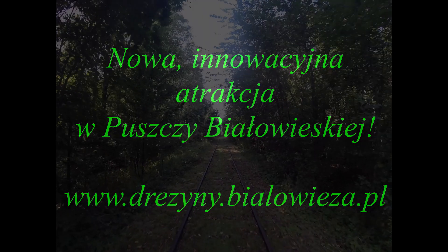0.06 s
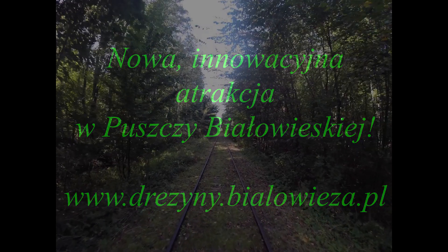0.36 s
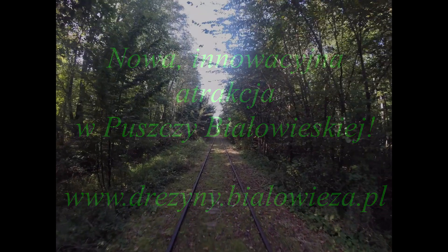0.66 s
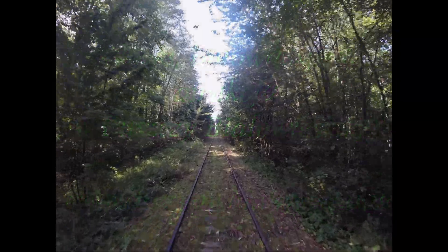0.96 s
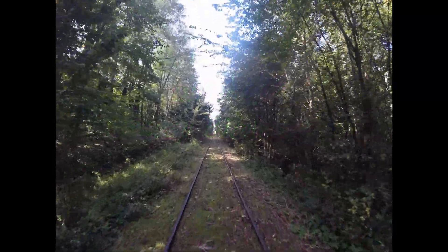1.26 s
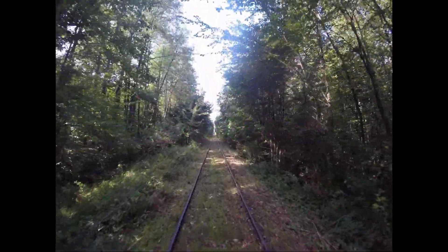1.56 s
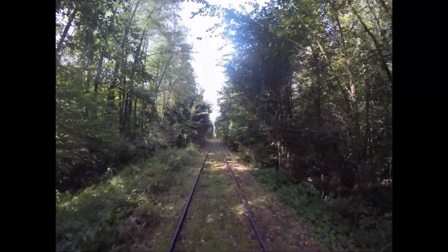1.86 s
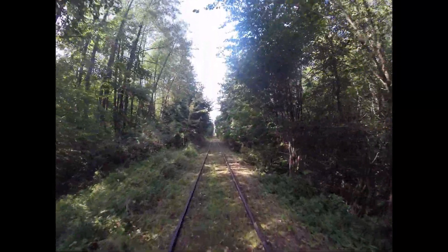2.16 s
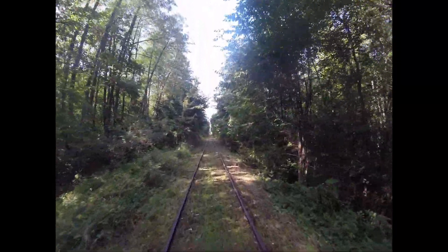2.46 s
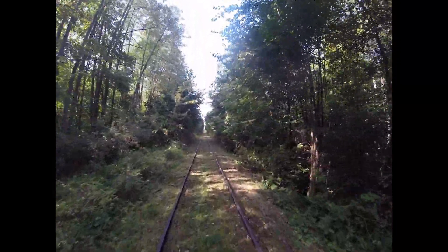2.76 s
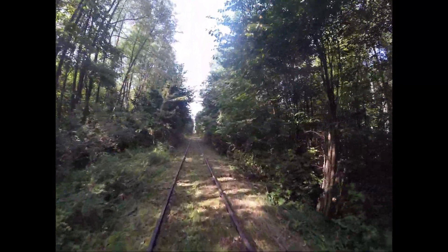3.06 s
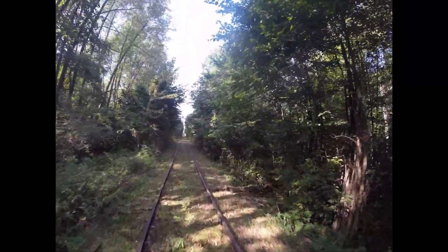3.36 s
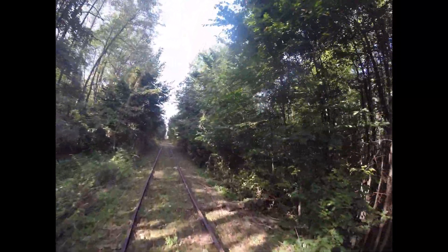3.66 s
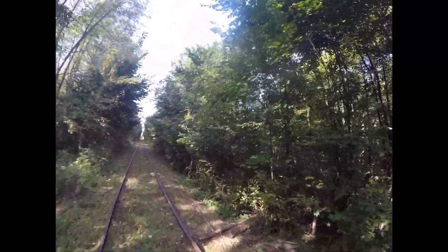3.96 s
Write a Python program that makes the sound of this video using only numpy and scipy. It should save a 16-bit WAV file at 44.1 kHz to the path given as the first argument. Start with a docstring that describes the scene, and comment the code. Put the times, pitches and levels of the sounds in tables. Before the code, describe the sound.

A small rail trolley rolls along a track with a low rumble and ringing wheels.

```python
"""A small rail trolley rolls steadily along a forest track, heard from on board; the sound fades in.
Rough rails keep the steel wheels and frame ringing, and uneven stretches make the deck boom in short swells.
The wheels rub on the rails with a wavering hiss and now and then knock on a flaw."""
import sys
import numpy as np
from scipy import signal
from scipy.fft import rfft, irfft
from scipy.io import wavfile

SR = 44100
rng = np.random.default_rng(int(sys.argv[2]) if len(sys.argv) > 2 else 0)


def transcribe(signal):
    """Save signal, clipped to [-1, 1], as a 16-bit WAV file at the path in sys.argv[1]."""
    frames = np.atleast_2d(signal).T
    limited = np.clip(frames, -1, 1)
    pcm = np.round(limited * 32767).astype(np.int16)
    wavfile.write(sys.argv[1], SR, pcm)


N = 176400

# fade-in: (s, dB)
FADE = [(0.31, -90), (0.35, -25), (0.5, -23), (0.62, -16.5), (0.9, -9), (1.2, -11)]
# level of the rolling noise: (s, dB)
ROLL = [(0.35, -55), (0.6, -33.5), (0.81, -35), (0.92, -25), (0.99, -33.5), (1.17, -23.5), (1.4, -24), (1.46, -16),
        (1.49, -24.5), (1.71, -27.5), (1.73, -20), (1.85, -31), (2.06, -22), (2.58, -25), (2.59, -19.5), (2.86, -25.5),
        (2.89, -20), (3.12, -26), (3.22, -19.5), (3.37, -28), (3.41, -23), (4.0, -24.5)]
# level of the ringing steel: (s, dB)
RING = [(0.36, -46), (0.55, -33), (0.85, -24), (1.15, -21), (1.33, -19.5), (1.44, -15.5), (1.57, -21),
        (1.92, -21.5), (2.07, -16.5), (2.2, -22), (2.33, -17), (2.55, -20.5), (2.8, -17), (2.92, -14.5),
        (3.06, -18.5), (3.18, -13), (3.28, -20.5), (3.5, -15), (3.63, -18), (3.95, -17.5)]
# level of the rubbing hiss: (s, dB)
RUB = [(0.35, -67), (0.37, -60.5), (0.64, -46.5), (0.88, -44), (0.91, -35.5), (1.09, -41), (1.25, -32), (1.42, -38.5),
       (1.44, -32.5), (1.58, -36), (1.63, -32.5), (1.72, -39), (1.75, -32), (1.94, -44), (2.08, -31), (2.32, -35),
       (2.76, -33.5), (2.84, -41), (2.92, -32), (3.01, -36.5), (3.03, -29), (3.12, -38), (3.23, -31), (3.43, -39),
       (3.49, -33), (3.74, -35), (3.78, -27.5), (4.0, -37)]
# rolling noise: (Hz, dB per Hz)
ROLL_SPECTRUM = [(20, -14), (35, -17), (50, 4.5), (75, -1), (100, 7.5), (150, 2), (230, 1.5), (310, -5), (400, 6.5), (520, 3.5), (740, -1), (1050, -7.5), (1350, -21.5), (2400, -16), (6000, -50.5)]
# hiss: (Hz, dB per Hz)
RUB_SPECTRUM = [(1500, -5.5), (3000, -4.5), (3800, -7.5), (4650, -3), (5150, 1.5), (5750, -1), (6500, 1.5), (7500, -7.5), (8500, -9.5), (10000, -17), (12500, -26.5), (15000, -44)]
ROLL_DB, RUB_DB, RING_DB = 1, 0.5, -3.5
# wheel and frame modes: (Hz, width Hz, dB)
STEEL_MODES = [(403, 23, -10.5), (814, 15, -14.5), (953.4, 24.6, -0.5), (1001, 41, -7), (1545, 11, -18.5), (1632, 24, -9.5), (2210, 41, -22.5), (2306, 37, -20.5), (2484, 15, -21.5), (2668, 11, -23.5), (2856, 29.6, -16), (3295, 8.2, -25), (3483, 8, -28), (3550, 20, -31.5), (4133, 9.8, -28.5), (4430, 16, -29), (4980, 37, -28.5), (6720, 13, -27.5)]
GRIT_PER_S, GRIT_SPREAD_DB, GRIT_SHARE = 600, 3.5, 0.49
CHATTER_DB, CHATTER_RATE = 1.52, 42
# knocks on rail flaws: (s, dB)
KNOCKS = [(0.645, -23), (1.042, -20.5), (1.426, -32), (1.611, -8), (1.729, -9.5), (1.993, -18.5), (2.3, -19), (2.577, -14), (2.900, -16.5), (3.559, -14), (3.949, -16)]
KNOCK_DECAY_S, KNOCK_RING_DB, KNOCK_CRACK_DB = 0.016, -0.5, -15
# clack of a knock: (Hz, dB per Hz)
CRACK_SPECTRUM = [(150, -8), (650, 8), (1300, -13), (2900, -1), (4000, -15), (6700, -25), (8000, -28), (12000, -47)]
# swells of the deck's boom: (start s, length s, level dB, pitch Hz)
BOOMS = [(0.353, 0.05, -35.5, 141), (0.55, 0.15, -23.5, 143.2), (0.854, 0.096, -15.5, 146.6), (0.971, 0.056, -19, 138),
         (1.178, 0.048, -11.5, 140), (1.232, 0.085, -14, 135.5), (1.357, 0.03, -16.5, 146),
         (1.421, 0.097, -10.5, 145.3), (1.535, 0.055, -17, 144.2), (1.617, 0.053, -15, 138),
         (1.731, 0.062, -11.5, 144), (1.81, 0.042, -12, 134), (1.986, 0.067, -16.5, 146), (2.086, 0.15, -18.5, 136),
         (2.323, 0.027, -8.5, 138), (2.383, 0.14, -14.0, 144.5), (2.595, 0.062, -13.5, 136.4),
         (2.747, 0.085, -15, 135), (2.858, 0.099, -18.0, 141.8), (2.981, 0.076, -13.5, 140), (3.095, 0.081, -19, 147),
         (3.233, 0.07, -13, 137), (3.442, 0.13, -16, 147), (3.581, 0.091, -14, 142.7), (3.712, 0.21, -12, 141.4),
         (3.958, 0.073, -14.5, 148)]
BOOM_DB, BOOM_ATTACK_S, BOOM_RELEASE_S, BOOM_WANDER_HZ, BOOM_FLUTTER_DB = -0.5, 0.025, 0.043, 5.84, 2.63
# deck modes under steady shaking: (Hz, width Hz, dB)
DECK_MODES = [(62.4, 12, -34.5), (129.4, 30.4, -17.5), (152, 30, -23)]
CUTOFF_HZ = 15300  # fixed
T = np.arange(N) / SR
# level of the dry rasp of the treads: (s, dB)
RASP = [(0.35, -63), (0.58, -50), (0.9, -41.5), (1.1, -40), (1.25, -32), (1.5, -36), (1.9, -39.5), (2.1, -34), (2.5, -32.5), (2.85, -34.5), (3.1, -33), (3.2, -30), (3.33, -34.5), (3.48, -30), (3.62, -35.5), (3.7, -33), (4.0, -35)]
# rasp: (Hz, dB per Hz)
RASP_SPECTRUM = [(700, -5.5), (1300, -6.5), (1850, 0.5), (2350, 2.5), (2800, -4), (3100, -5.5), (3750, -6.5), (6000, -32)]
RASP_DB, HISS_FLICKER_DB = -1, 1.5
KNOCK_RISE_S, KNOCK_DAMPING_HZ, KNOCK_TILT_DB_PER_OCTAVE = 0.0018, 12, 0.5
KNOCK_SPREAD_S = .002   # a blow takes this long to reach every mode
CEILING = .88  # fixed


def from_db(db):
    """Decibels to gain."""
    return 10 ** (np.asarray(db) / 20)


def rms_one(x):
    """Scale to unit power."""
    return x / np.sqrt(np.mean(x ** 2) + 1e-20)


def level(rows):
    """Gain along a level curve."""
    return from_db(np.interp(T, *np.transpose(rows)))


def drift(rate):
    """Slow chance with spread 1."""
    r = np.exp(-2 * np.pi * rate / SR)
    return rms_one(signal.lfilter([1], [1, -2 * r, r * r], rng.standard_normal(N + SR))[SR:])


def colour(x, spectrum):
    """Shape a white signal by a spectrum, keeping its power."""
    hz, db = np.transpose(spectrum)
    gain = from_db(np.interp(np.log(np.fft.rfftfreq(N, 1 / SR) + 1), np.log(hz), db))
    return irfft(rfft(x) * rms_one(gain), N)


def resonate(x, hz, width_hz):
    """One resonance that keeps the power of white noise."""
    r = np.exp(-np.pi * width_hz / SR)
    return signal.lfilter(np.sqrt((1 - r * r) / 2) * np.array([1, 0, -1]), [1, -2 * r * np.cos(2 * np.pi * hz / SR), r * r], x + 1e-18)


def contact():
    """Force between wheel and rail: fine roughness plus crushed grit."""
    sizes = from_db(GRIT_SPREAD_DB * np.minimum(rng.exponential(1, N), 4)) * rng.choice([-1, 1], N)
    grit = rms_one(sizes * (rng.random(N) < GRIT_PER_S / SR))
    share = np.clip(GRIT_SHARE, 0, 1)
    return np.sqrt(share) * grit + np.sqrt(1 - share) * rng.standard_normal(N)


def steel(force):
    """Each mode of the wheels and frame takes its own share of the contact force."""
    return sum(from_db(db) * mode(force * contact(), hz, width_hz) for hz, width_hz, db in STEEL_MODES)


def rolling():
    """Roar, rasp, ring and hiss of the wheels; all but the hiss chatter together."""
    chatter = rms_one(from_db(CHATTER_DB * drift(CHATTER_RATE)))
    roar = from_db(ROLL_DB) * level(ROLL) * colour(chatter * contact(), ROLL_SPECTRUM)
    rasp = from_db(RASP_DB) * level(RASP) * colour(chatter * rng.standard_normal(N), RASP_SPECTRUM)
    ring = from_db(RING_DB) * steel(level(RING) * chatter)
    hiss = from_db(RUB_DB + HISS_FLICKER_DB * drift(58)) * level(RUB) * colour(rng.standard_normal(N), RUB_SPECTRUM)
    return roar + rasp + ring + hiss


def knocks():
    """A short blow gives a clack and a bright, quickly damped ring of the steel modes."""
    blows = np.zeros(N)
    for s, db in KNOCKS:
        blows[int(s * SR)] = from_db(db)
    shape = np.exp(-T / KNOCK_DECAY_S) * (1 - np.exp(-T / KNOCK_RISE_S))
    clack = colour(signal.fftconvolve(blows, shape)[:N] * rng.standard_normal(N), CRACK_SPECTRUM)
    ring = 0
    for hz, width_hz, db in STEEL_MODES:
        damped_hz = width_hz + KNOCK_DAMPING_HZ
        octaves = np.log2(hz / 1000)  # fixed
        gain = from_db(db + KNOCK_TILT_DB_PER_OCTAVE * octaves) * np.sqrt(SR / (2 * np.pi * damped_hz))
        ring = ring + rng.choice([-1, 1]) * gain * mode(np.roll(blows, int(rng.random() * KNOCK_SPREAD_S * SR)), hz, damped_hz)
    return from_db(KNOCK_CRACK_DB) * clack + from_db(KNOCK_RING_DB) * ring


def deck():
    """The deck drones under the shaking and booms over each uneven stretch."""
    out = 0
    for hz, width_hz, db in DECK_MODES:
        out = out + from_db(db) * rms_one(resonate(resonate(rng.standard_normal(N), hz, width_hz), hz, width_hz))
    out = out * level(FADE)
    wander, flutter = BOOM_WANDER_HZ * drift(14), from_db(BOOM_FLUTTER_DB * drift(18.3))
    for s, length, db, hz in BOOMS:
        rise = np.clip((T - s) / BOOM_ATTACK_S + .5, 0, 1)
        fall = np.clip((s + length - T) / BOOM_RELEASE_S + .5, 0, 1)
        swing = np.sin(2 * np.pi * (np.cumsum(hz + wander) / SR + rng.random()))
        out = out + from_db(db + BOOM_DB) * np.sqrt(2) * np.sin(np.pi / 2 * rise * fall) ** 2 * flutter * swing
    return out


def mode(force, hz, width_hz):
    """One steel mode, its skirts gently trimmed by a band-pass."""
    skirts = signal.butter(1, [hz * .8, hz * 1.25], "band", fs=SR, output="sos")  # fixed
    return signal.sosfilt(skirts, resonate(force, hz, width_hz))


def scene():
    """Everything on board, after a short silence."""
    opening = np.clip((T - .333) / 0.026, 0, 1)
    return (opening * (rolling() + knocks() + deck()))[None]


def record(dry):
    """The highest peaks are rounded and the top is cut."""
    rounded = dry / (1 + (dry / CEILING) ** 8) ** (1 / 8)  # fixed
    return signal.sosfilt(signal.ellip(10, .1, 80, CUTOFF_HZ, fs=SR, output="sos"), rounded)  # fixed


dry = scene()
out = record(dry)
transcribe(out)
```